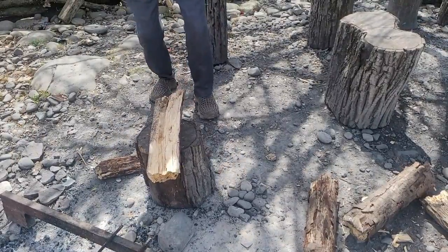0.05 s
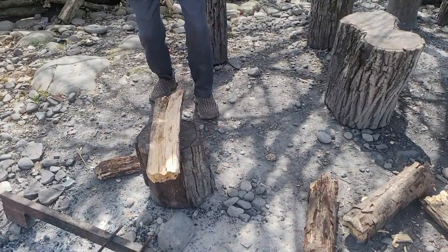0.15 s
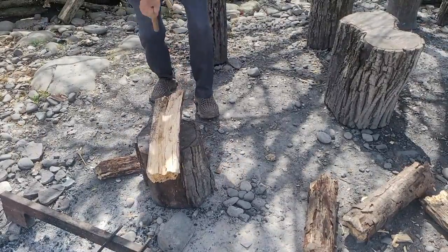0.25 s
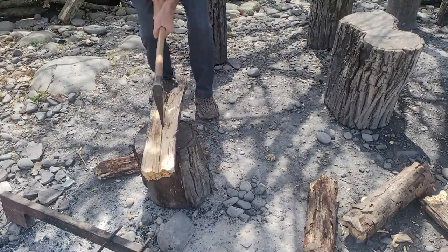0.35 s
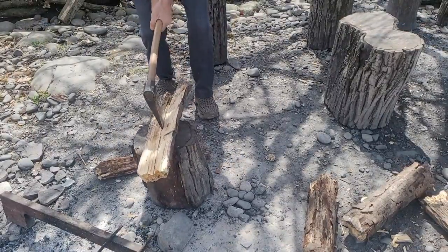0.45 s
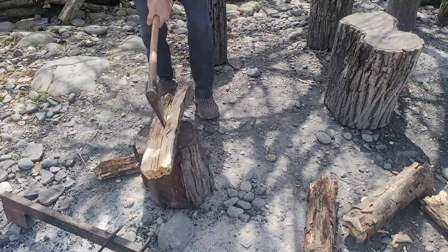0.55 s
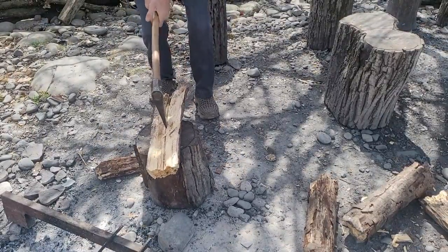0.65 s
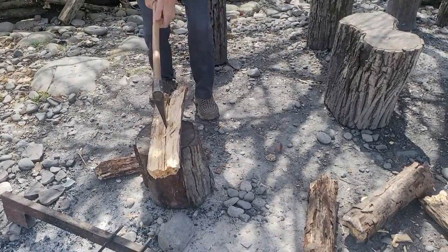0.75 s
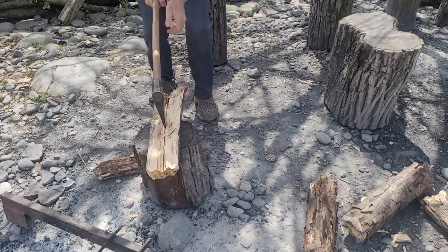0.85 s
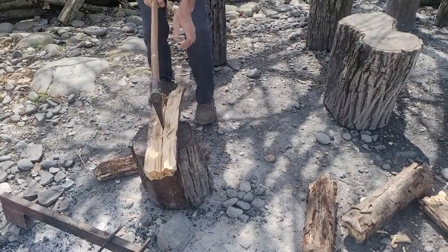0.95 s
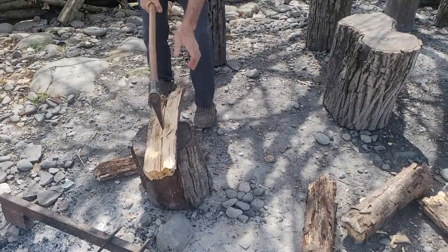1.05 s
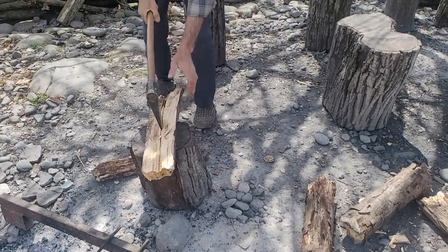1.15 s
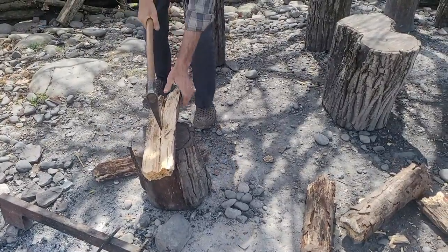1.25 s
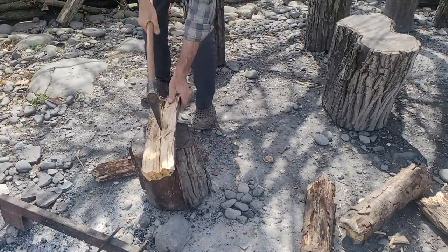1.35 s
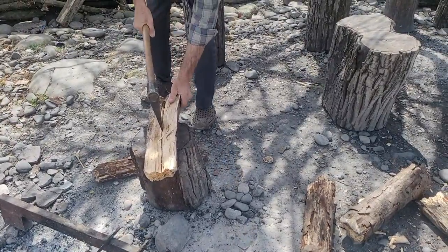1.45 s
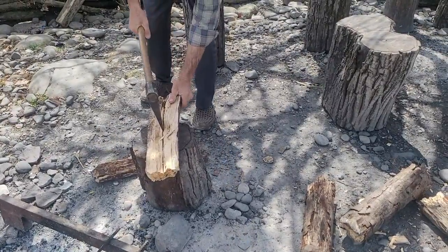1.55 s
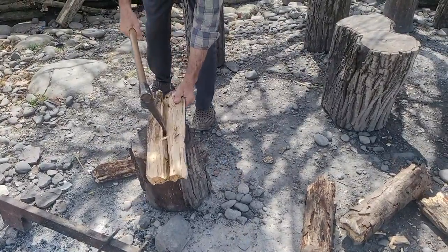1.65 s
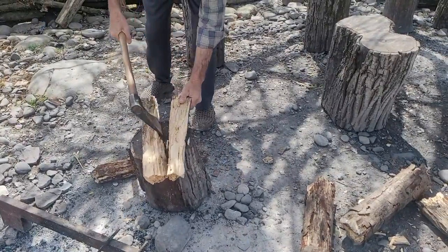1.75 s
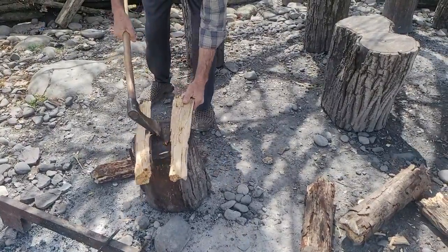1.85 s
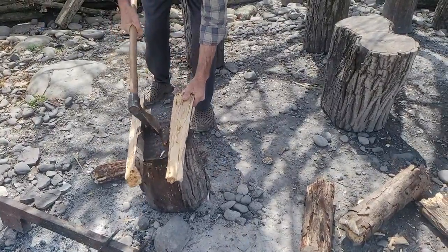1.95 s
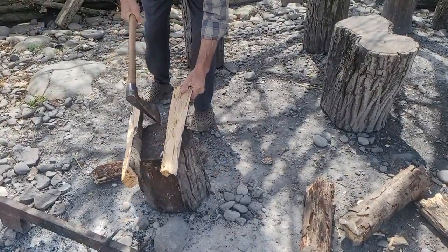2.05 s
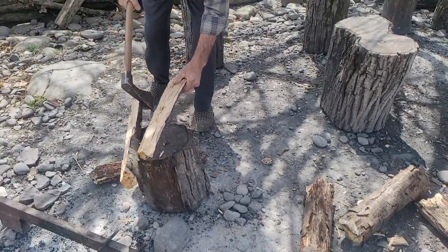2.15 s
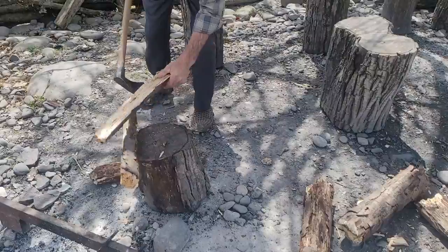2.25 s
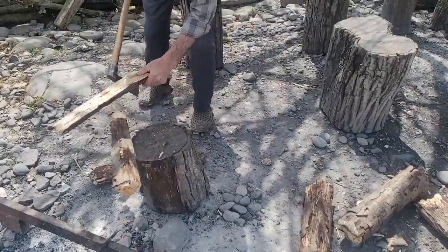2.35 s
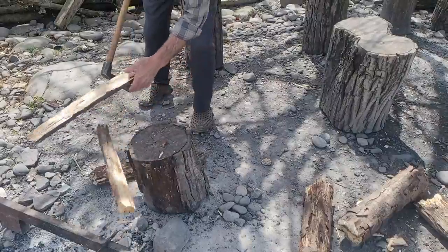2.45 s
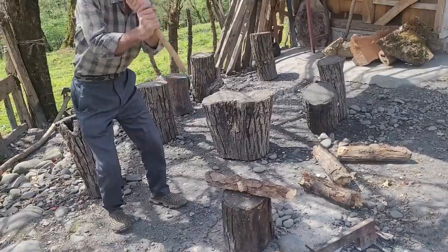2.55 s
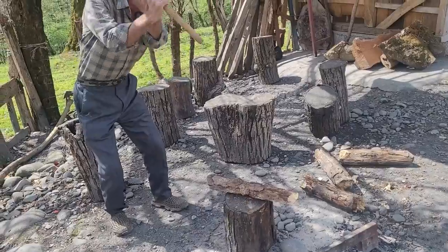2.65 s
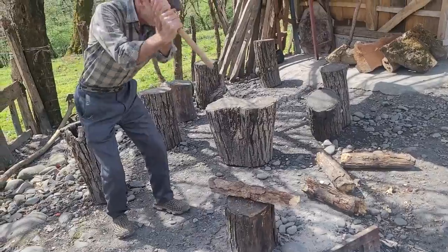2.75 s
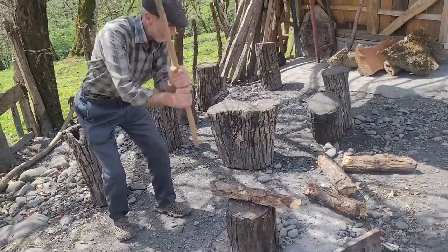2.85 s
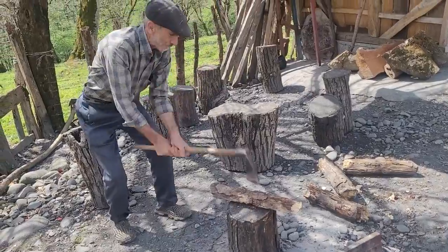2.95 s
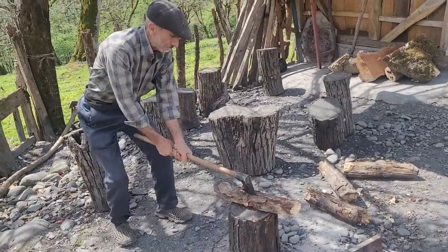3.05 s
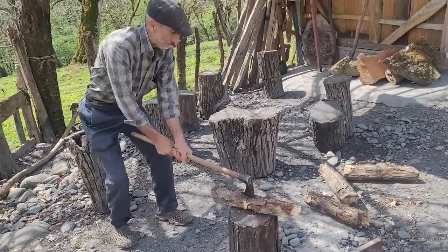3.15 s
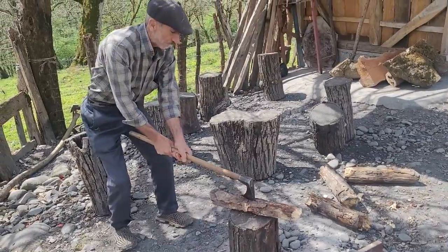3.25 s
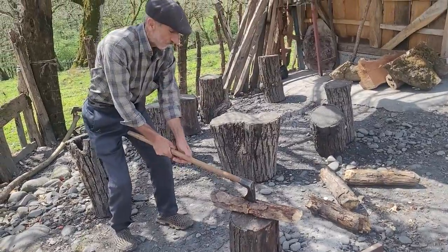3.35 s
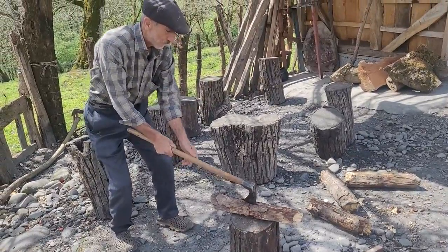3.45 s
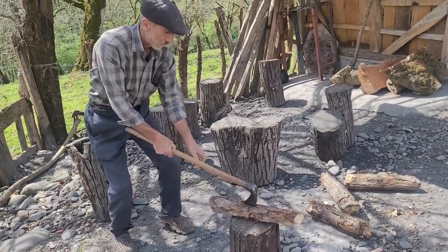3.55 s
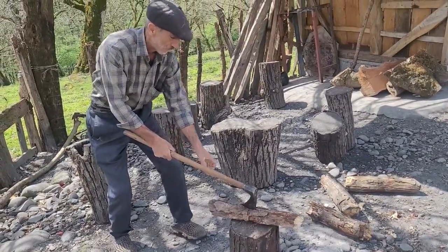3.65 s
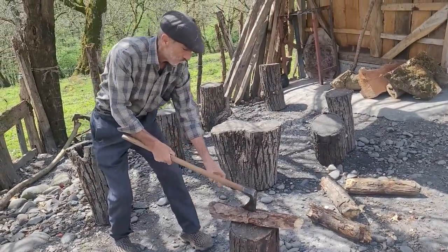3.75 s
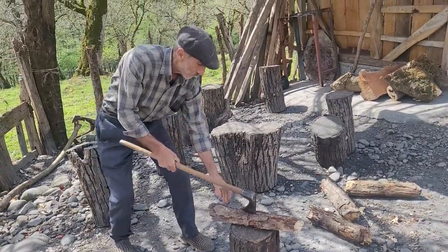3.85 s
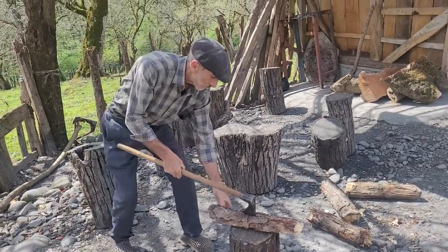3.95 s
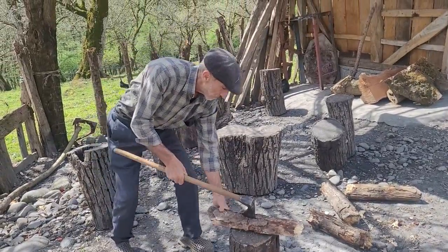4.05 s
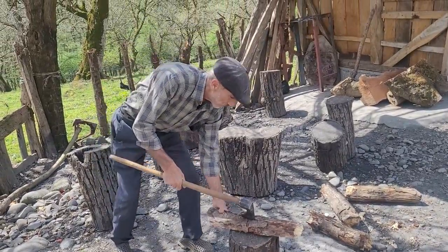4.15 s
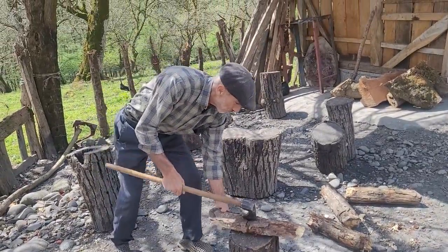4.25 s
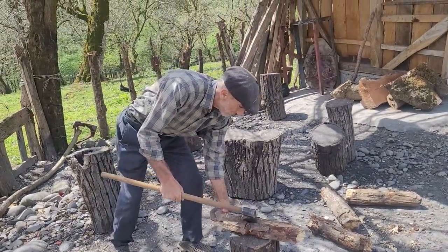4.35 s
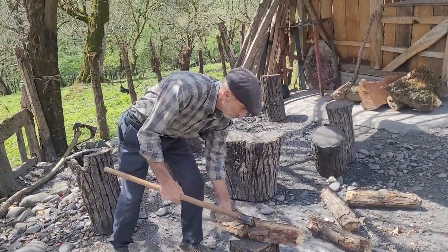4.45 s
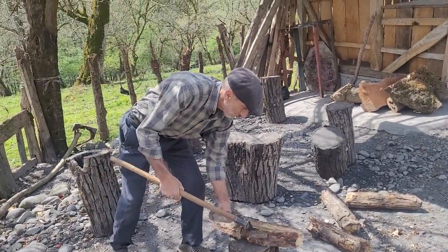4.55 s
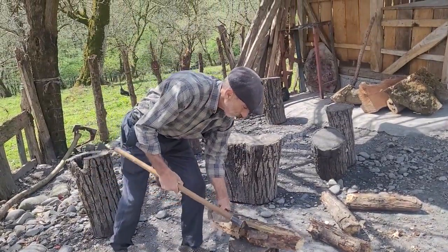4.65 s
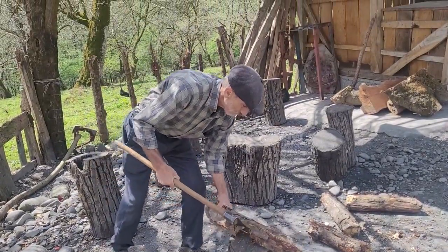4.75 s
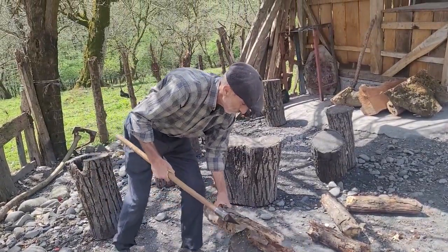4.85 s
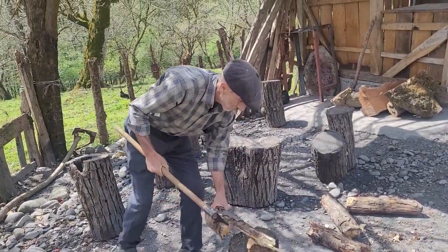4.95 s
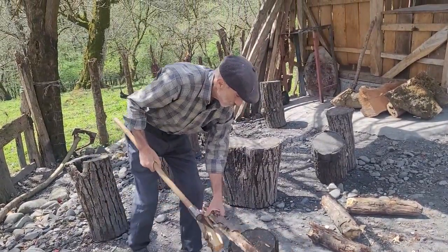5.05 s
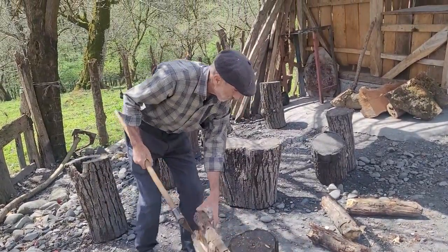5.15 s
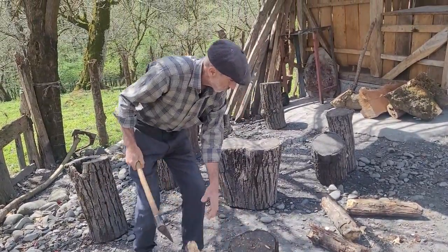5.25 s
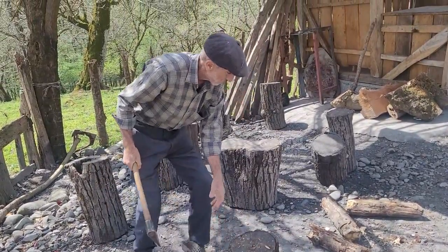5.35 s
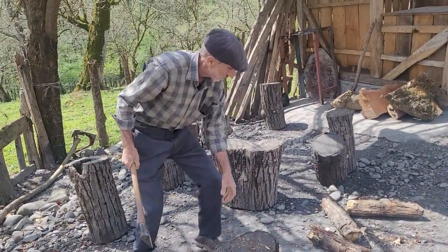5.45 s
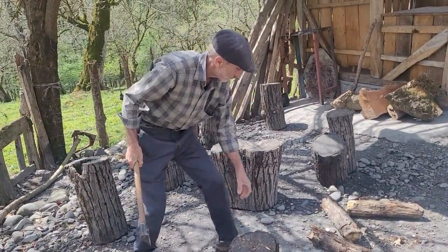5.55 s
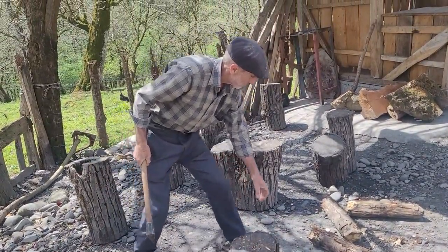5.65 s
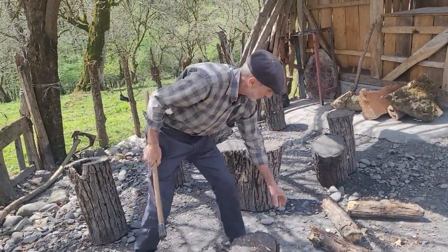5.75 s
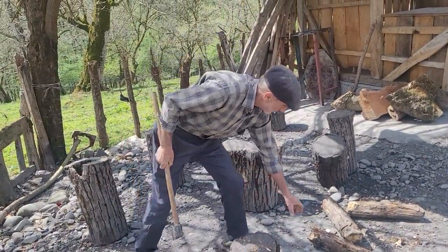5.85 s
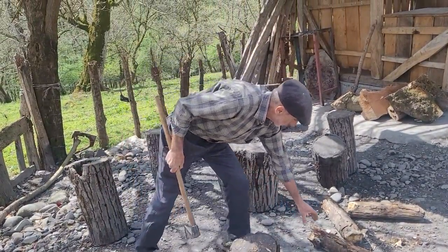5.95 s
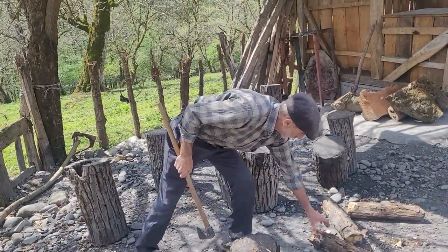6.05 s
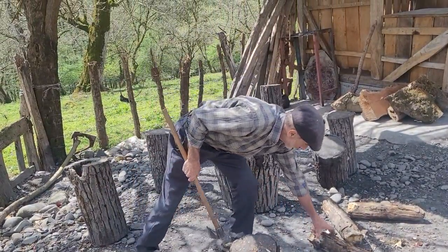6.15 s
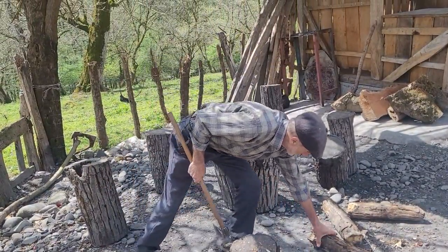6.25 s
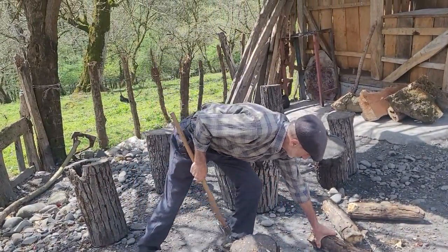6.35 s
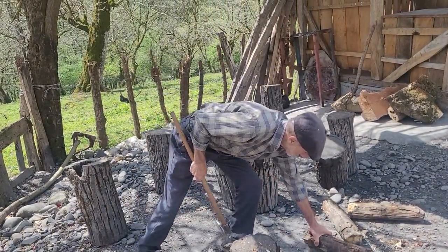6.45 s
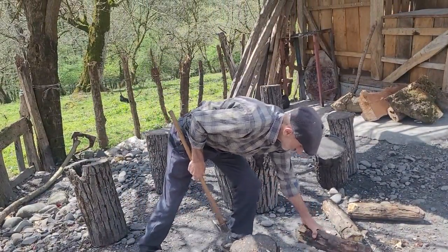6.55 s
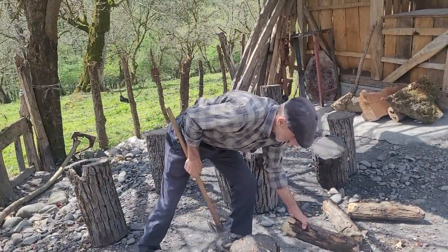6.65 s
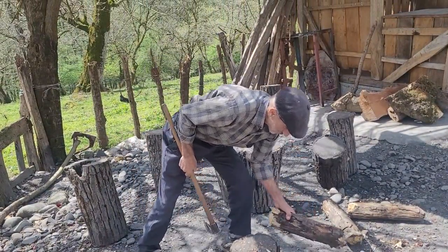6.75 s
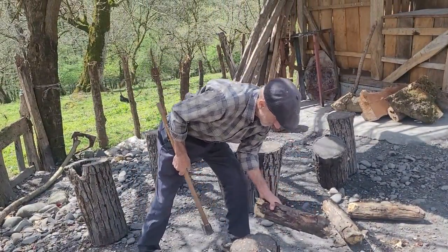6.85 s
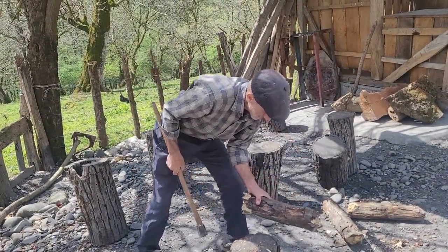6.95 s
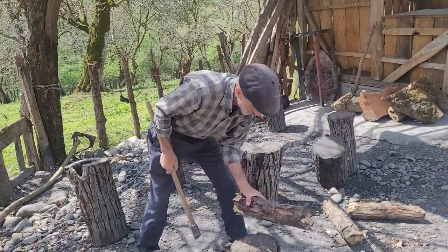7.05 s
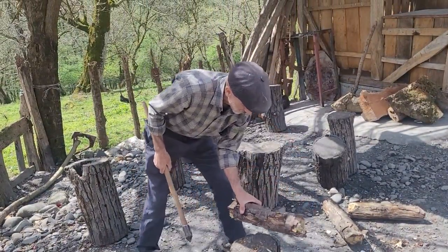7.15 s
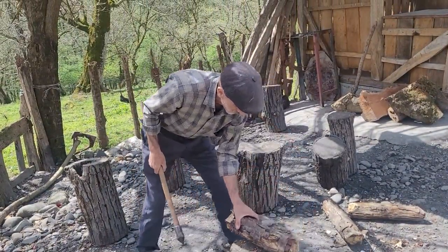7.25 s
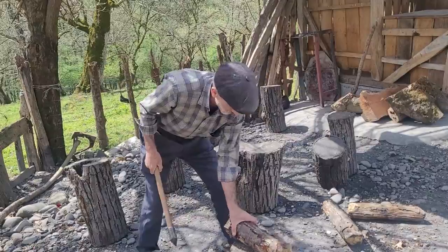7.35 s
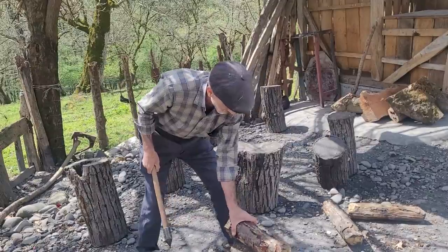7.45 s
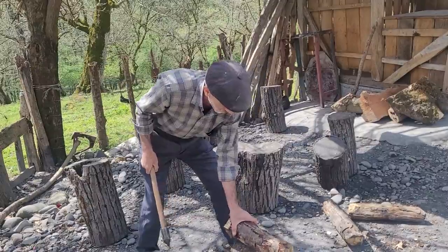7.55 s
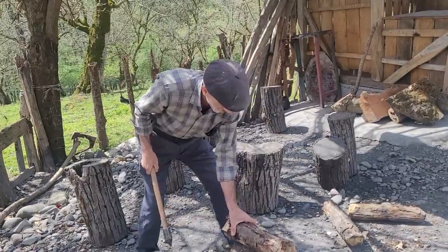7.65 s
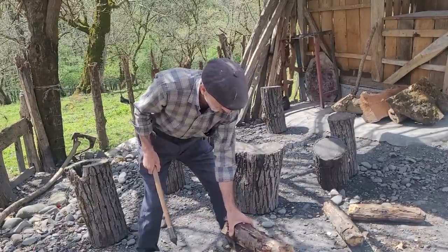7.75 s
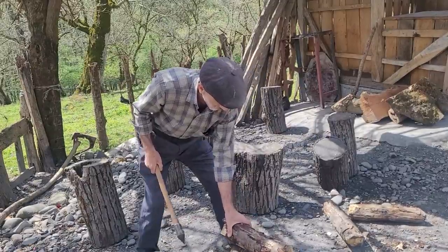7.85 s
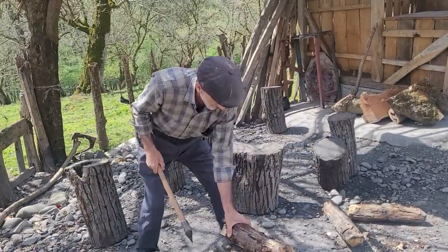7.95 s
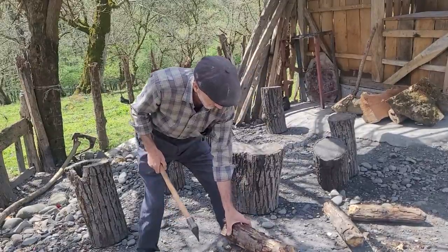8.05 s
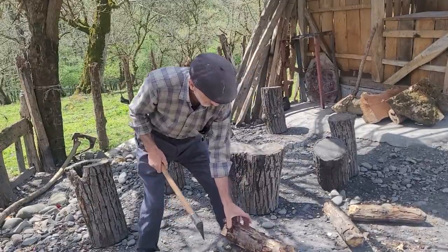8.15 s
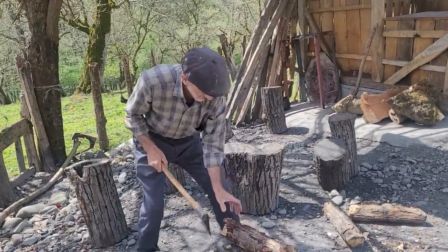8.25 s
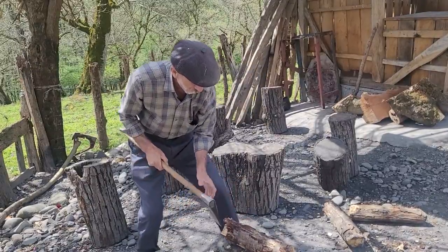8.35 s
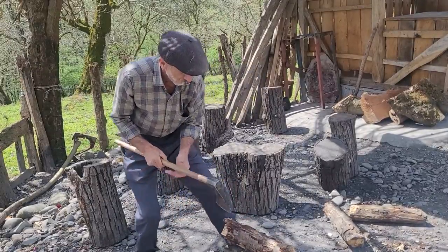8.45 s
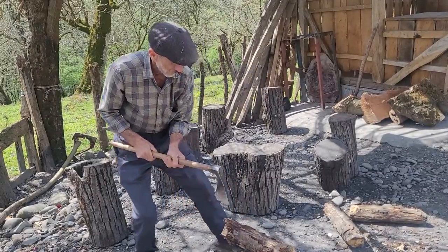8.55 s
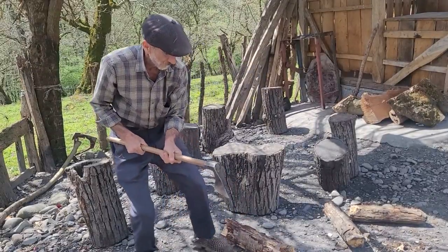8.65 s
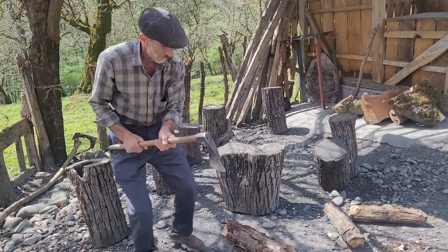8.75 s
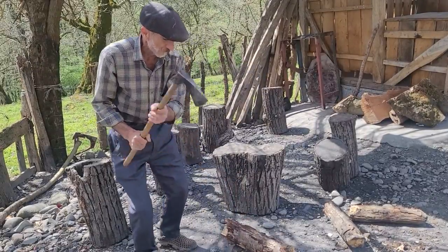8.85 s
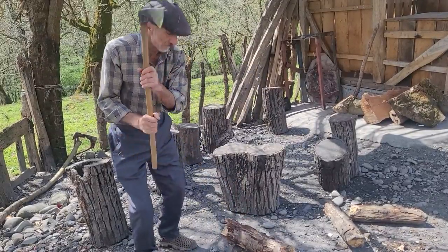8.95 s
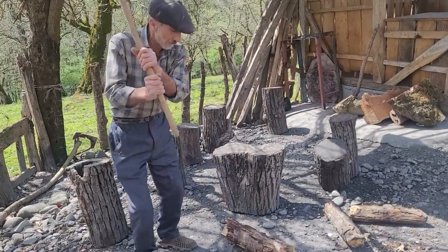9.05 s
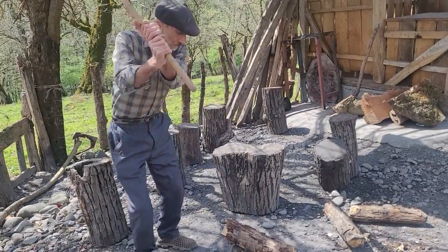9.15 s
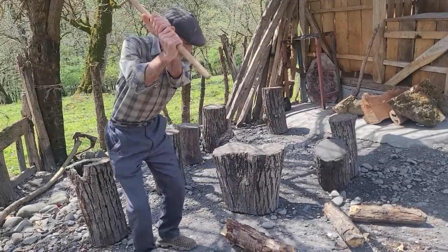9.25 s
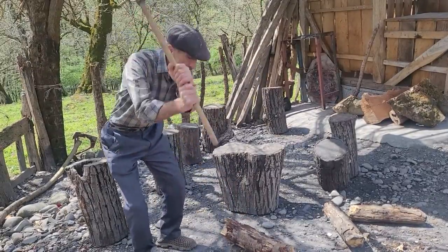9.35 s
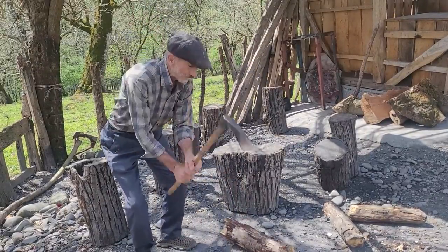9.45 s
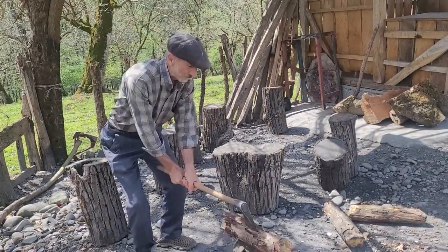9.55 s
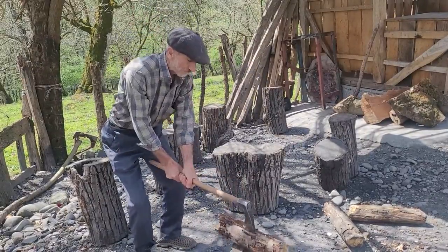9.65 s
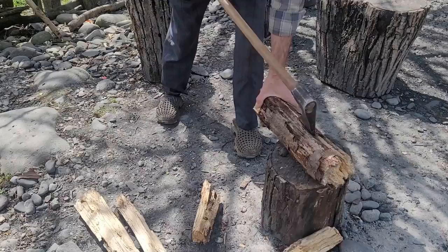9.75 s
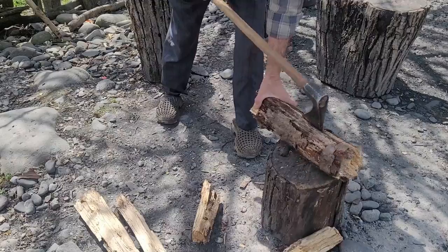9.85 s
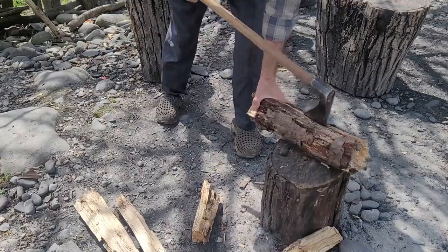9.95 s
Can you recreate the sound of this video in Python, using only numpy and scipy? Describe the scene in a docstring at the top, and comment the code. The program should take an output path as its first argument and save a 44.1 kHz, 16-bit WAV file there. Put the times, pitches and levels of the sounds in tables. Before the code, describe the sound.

Three heavy axe blows on wood, with splitting snaps, tumbling billets, a brief scrape over stones and sparrows chirping around.

```python
"""A sparrow cheeps over faint air and a far drone, then an axe splits firewood on a chopping block.
Blows, and a log set on the block, are decaying modes of log, block and earth with filtered grain bursts.
Billets snap apart, knock together and land; the axe head skids over stones; bark and soles rub.
Birds are gliding sines with a fast pitch buzz. Noise responses add the yard's scatter, tail and shed echo."""
import sys
import numpy as np
from scipy import signal
from scipy.fft import rfft, irfft
from scipy.io import wavfile

SR = 44100
rng = np.random.default_rng(int(sys.argv[2]) if len(sys.argv) > 2 else 0)


def to_wav(sig):
    """Store sig (one row per channel, or 1-D mono) as 16-bit WAV at the path in sys.argv[1].

    Samples outside -1..1 are clipped; the rate is SR.
    """
    pcm = np.clip(np.atleast_2d(sig), -1, 1) * 32767
    pcm = np.round(pcm).astype(np.int16)
    wavfile.write(sys.argv[1], SR, pcm.T)  # frames by channels


N = 440559
TIME_S = np.arange(N) / SR
SHORT_S = TIME_S[:SR // 2]  # half a second, for single events
TOP_HZ = 16000

# Crunch and yard bands: (low edge [Hz], high edge [Hz])
BANDS_HZ = [(170, 500), (500, 1500), (1500, 5000), (5000, 14500)]

# Air spectrum: (frequency [Hz], relative density [dB per Hz])
AIR_SPECTRUM = [(30, -8), (100, -7), (200, -13), (290, -8), (450, -14.5), (600, -11.5), (970, -16.5),
                (1400, -20), (2500, -28.5), (4000, -16), (7000, -28), (15000, -35)]
AIR_DB, RUMBLE_DB = -69.5, -76
# Rumble swells: (peak time [s], rise [s], fall [s], level [dB])
RUMBLE_SWELLS = [(0, .1, .4, -61), (.6, .4, .55, -57.5), (2.4, 0.29, 0.37, -51.5), (9.98, .3, .1, -57.5)]
# Far drone before its wobble: (time [s], frequency [Hz], level [dB])
DRONE_TRACK = [(0, 650, -66.5), (1.1, 640, -75), (2.2, 647, -64.5), (3.2, 650, -73), (5, 645, -77.5),
               (7.2, 595, -88.5), (8.2, 573, -69.5), (8.5, 574, -86), (10, 586, -81)]

# Bird notes: (time in note [s], frequency before pitch factor [Hz], relative level [dB], buzz depth [Hz])
# Sparrow: sharp flick, then buzzing fall
CHEEP_NOTE = [(0, 3300, -22, 1), (.008, 4340, -14, 80), (.013, 5120, -5.5, 150), (.021, 4580, -11, 310),
              (.032, 4220, -8, 250), (.037, 3950, 0, 280), (.06, 3614, -3.5, 260), (.08, 3600, -6, 210),
              (.112, 2920, -26.5, 180)]
# Chirrup, same columns
CHIRRUP_NOTE = [(0, 3844, -10.5, 3.5), (.025, 5423, 4.5, 204), (.038, 4266, -0.5, 109.5),
                (.055, 3750, -5.5, 82), (.08, 3000, -18, 56.5), (.1, 3248, -5.5, 77),
                (.118, 4122, -3.5, 119.5), (.132, 3597, -5.5, 77.5), (.155, 3288, -20, 54)]
# Small bird's thin whistle, same columns
WHISTLE_NOTE = [(0, 8010, 10, 6), (.018, 8695, -3, 13), (.09, 7850, 3.5, 34.5), (.16, 7900, 1, 84),
                (.2, 7773, -16.5, 0)]
# Small bird's falling slur, same columns
SLUR_NOTE = [(0, 7900, -11, 1.5), (.018, 6500, -2.5, 30.5), (.04, 5800, -1, 29), (.065, 5400, -4, 29.5),
             (.085, 5950, -7, 33.5), (.11, 6020, -15.5, 22.5)]
# Cheep calls: (time [s], relative level [dB], pitch factor [ratio])
CHEEP_CALLS = [(.005, -29, 0.98), (1.014, -37, 0.98), (1.735, -37, 1), (2.356, -30.5, 1.014),
               (3.056, -38.5, 1.03), (3.997, -38.5, 1.003), (5.184, -34, 0.99), (6.254, -34.5, 1),
               (7.149, -35.5, 0.99), (8.275, -36, 0.98), (9.592, -37, 0.98), (9.814, -38, 0.99)]
# Chirrup calls, same columns
CHIRRUP_CALLS = [(1.044, -49.5, 0.93), (1.372, -58, 1), (1.43, -53, 0.92), (1.881, -43.5, 0.97),
                 (2.661, -43.5, 1), (3.365, -43.5, 1), (4.866, -47.5, 0.94), (4.921, -45, 0.93),
                 (5.389, -40, 0.95), (6.006, -38.5, 0.94), (6.74, -43.5, 1), (7.702, -67.5, 0.96),
                 (8.0, -62, 1), (8.709, -57, 0.93), (8.958, -55, 1), (9.266, -44.5, 1)]
# Whistle calls, same columns
WHISTLE_CALLS = [(2.25, -60.5, 1.025), (2.496, -68, 0.9), (6.26, -68, 1.07), (6.52, -65.5, .99),
                 (6.77, -67, 1.06)]
# Slur calls, same columns
SLUR_CALLS = [(0.056, -48.5, 1.036), (0.259, -52.5, 0.95), (7.012, -67, 1.05), (7.195, -61, 1.05)]

# Bark dragged over wood and gravel: (peak time [s], rise [s], fall [s], level [dB], grit re level [dB])
BARK_DRAGS = [(1.474, 0.38, 0.055, -64.5, -6), (1.712, .01, 0.018, -36.5, -9.5),
              (3.43, 0.033, 0.14, -60.5, -18), (3.97, .25, .05, -72.5, -9), (4.458, .06, 0.047, -69, -9),
              (4.884, 0.14, 0.67, -71, 5.5), (5.205, 0.084, 0.044, -52.5, -11), (5.485, 0.026, .13, -66, 5),
              (5.68, 0.068, 0.022, -53, -21), (5.91, 0.022, 0.28, -53.5, -18.5),
              (6.54, 0.091, .08, -53, -11), (8.864, 0.13, 0.048, -47, -14), (9.856, .06, 0.38, -52, -13)]
# Soles shifting on gravel, same columns
SOLE_SHUFFLES = [(1.82, 0.063, 0.028, -50, -19), (1.89, 0.072, .12, -55.5, -25.5),
                 (2.6, 0.088, 0.73, -63, 0), (3.43, .15, 0.32, -66, -10), (4.46, 0.86, .45, -68, 0.5),
                 (4.72, 0.19, .03, -90.5, 28), (5.1, .3, 0.23, -70.5, -1.5), (6.45, 1, 0.59, -76, 7),
                 (8.64, 0.14, .12, -59.5, -12.5), (8.864, .2, .2, -61.5, -14),
                 (9.97, .08, 0.093, -66.5, -7.5)]
# Axe head cutting the air: (peak time [s], level [dB])
AXE_SWINGS = [(3.019, -49)]
SWING_RISE_S, SWING_FALL_S = .17, .02
GESTURE_FADE_DB = 20  # loss one rise before, or one fall after, a gesture's peak

# Axe head skidding over stones: (time [s], level [dB], t60 [s])
AXE_SKIDS = [(5.706, -35, 0.039), (5.737, -27.5, 0.27), (5.801, -30, 0.037), (5.865, -39, 0.26),
             (5.953, -53, 0.1)]
# Steel and stone resonances: (frequency [Hz], width, at least 35 used [Hz], relative level [dB])
SKID_RESONANCES = [(448, 81, 0.5), (578, 15, 3), (1126, 160, 6), (1560, 280, 4.5), (2190, 72, -2),
                   (2395, 20, -1), (2650, 60, 3.5), (3063, 30, 11.5), (3500, 22, -24), (3590, 26, -29),
                   (3820, 30, -35)]

# Loose-billet resonances: (frequency before pitch factor [Hz], width [Hz], relative level [dB])
BILLET_RESONANCES = [(278, 66, 12.5), (336, 120, -9), (600, 70, -5.5), (720, 80, 4), (1000, 80, -3),
                     (1284, 90, -2), (1480, 90, -4.5), (1620, 120, -6), (2333, 150, -2), (2910, 110, -3.5),
                     (3540, 250, -7.5)]
CONTACT_LAG_S = .0013  # snaps and knocks start this long after their table time
# Snapping fibres: (time before lag [s], relative level [dB], brightness [dB per band], t60 [s])
FIBRE_SNAPS = [(.568, -64.5, 8.5, 0.024), (0.694, -66, -4, 0.043), (1.618, -28, -2.5, 0.018),
               (1.647, -34.5, -3, 0.052), (1.657, -35, 1, 0.12), (1.671, -29.5, -3, 0.21),
               (3.612, -60, 9, 0.14), (3.638, -61, 9.5, .05), (4.235, -54.5, 6, .05),
               (4.257, -43.5, 4.5, 0.15), (4.29, -35.5, -2.5, 0.068), (4.311, -43.5, 4, .068),
               (4.369, -56, 7, .02), (5.4106, -32.5, -5.5, 0.027), (7.354, -48, -1, 0.069),
               (7.665, -63.5, 1.5, .05)]
# Billets knocking and landing, same columns
BILLET_KNOCKS = [(1.024, -58, 1.5, .11), (1.321, -65.5, 1.5, 0.045), (1.459, -54.5, 4.5, .05),
                 (1.682, -23.5, 6, 0.024), (1.735, -76, -16.5, 0.035), (1.834, -41, 5, 0.031),
                 (3.139, -52, -1, 0.072), (3.784, -52.5, 1, 0.097), (4.338, -50.5, 1, 0.094),
                 (4.431, -72, -9, 0.16), (4.76, -48, 6.5, 0.024), (4.772, -51, 4.5, 0.074),
                 (4.81, -64, -3, .044), (5.227, -41.5, -2.5, 0.063), (5.241, -44, 3, .088),
                 (5.297, -50.5, 0.5, 0.06), (5.329, -38, 9.5, 0.051), (5.338, -37.5, -2.5, 0.062),
                 (5.351, -46, -5.5, 0.038), (5.439, -37.5, 0.5, 0.037), (5.446, -37, 1, .045),
                 (5.545, -49, 5, 0.028), (5.671, -60.5, 0.5, 0.15), (5.71, -45, 1.5, 0.079),
                 (5.875, -57.5, -4, 0.037), (8.782, -52.5, 6.5, .08), (8.834, -56, 2.5, .047),
                 (8.882, -51, 4.5, 0.08)]
# Snap spectrum: (level offset in each of BANDS_HZ [dB])
SNAP_COLOUR_DB = [-29.5, -16.5, 0.5, -2]
# Knock spectrum, same columns
KNOCK_COLOUR_DB = [1.5, 3, 0.5, -9]
SNAP_TICK_DB, KNOCK_TICK_DB = 10.5, 4  # re event level
CHIP_DB, CHIP_T60_S = -68.5, .06
# Taps on a freely swinging split half: (time [s], relative level [dB])
SPLIT_HALF_TAPS = [(1.838, -41.5), (2.265, -32.5)]
# Split-half modes: (frequency before pitch factor [Hz], relative level [dB], t60 [s])
SPLIT_HALF_MODES = [(555, 1.5, 0.19), (775, -14, 0.14), (1350, -13.5, 0.086), (2360, -32.5, 0.052)]

# Log-on-block modes: (frequency before pitch factor [Hz], relative level [dB], t60 [s])
LOG_MODES = [(262.5, -1, 0.097), (323, -15, 0.14), (400, -18.5, 0.092), (445, -23.5, .05),
             (625, -30.5, .09), (665, -26.5, .1), (770, -30.5, 0.11), (1124, -36.5, 0.15),
             (1273, -31, 0.11), (1450, -30, 0.093), (1850, -36, 0.25), (2080, -38.5, .12)]
# Chopping-block hum under every contact: (frequency [Hz], relative level [dB], t60 [s])
STUMP_MODES = [(232.3, -16.5, 0.24)]
# Block-on-earth modes: (frequency before pitch factor [Hz], relative level [dB], t60 [s])
GROUND_MODES = [(70, -2.5, 0.087), (106, -5.5, 0.11)]
# Weight coming down on the earth: (time [s], relative level [dB])
EARTH_THUDS = [(1.685, -47), (1.736, -64), (1.829, -36), (3.14, -34), (5.232, -48), (5.341, -42.5),
               (5.443, -46), (5.8, -44), (5.85, -43)]
# Second contact, log pressed on the block or bouncing back: (time [s], relative thump level [dB],
# pitch factor [ratio], relative ground level [dB], relative crunch level [dB],
# crunch brightness [dB per band])
SECOND_CONTACTS = [(0.3571, -14.5, 1.0, -10.5, -27.5, -3.5), (.449, -24, 1, -42, -50, -4.5),
                   (3.0444, -9, 0.98, -18, -29.5, -.5), (7.3345, -27, 0.95, -38, -47.5, 6.5),
                   (9.5712, -5.5, 0.94, -11, -40, -3), (9.691, -23.5, 0.97, -28, -53, -4.5)]
# First contact, blade biting the log or (7.32 s) a log set on the block: (time [s],
# relative thump level [dB], thump pitch factor [ratio], knock before pitch factor [Hz],
# relative knock level [dB], relative crunch level [dB], crunch brightness [dB per band])
FIRST_CONTACTS = [(0.3495, -2, 1.05, 700, -6, -27, -6.5), (3.0325, -18.5, 1.44, 790.5, -22.5, -28, 1),
                  (3.0362, -12, 1.32, 1400, -11, -24, -0.5), (7.3232, -23, .96, 1210, -37.5, -40.5, 4),
                  (9.56, -12, 1.2, 1284, -12, -32.5, -2), (9.563, -4, 1.02, 380, -12, -31.5, -5.5)]
FIRST_T60_S, SECOND_T60_S = .05, 0.12
FIRST_GROUND_DB = -33.5  # re thump


def amp(db):
    """Decibels to gain."""
    return 10 ** (np.asarray(db) / 20)


def unit(x):
    """Scale to rms 1."""
    return x / np.sqrt(np.mean(x ** 2))


def curves(table, t_s=TIME_S):
    """Join table columns by straight lines in time."""
    s, *columns = np.transpose(table)
    return [np.interp(t_s, s, c) for c in columns]


def add(out, s, x):
    """Mix a sound in at time s."""
    i = max(int(s * SR), 0)
    out[:, i:i + x.shape[-1]] += x[..., :N - i]


def band(x, lo_hz, hi_hz, order=3):
    """Causal band-pass."""
    edges_hz = [lo_hz, min(hi_hz, .49 * SR)]
    return signal.sosfilt(signal.butter(order, edges_hz, "band", fs=SR, output="sos"), x)


def decay(t60_s):
    """Exponential decay, 60 dB in t60_s."""
    return 1000 ** (-SHORT_S / t60_s)


def onset(rise_s):
    """Exponential approach to full gain."""
    return 1 - np.exp(-SHORT_S / rise_s)


def pair(size, apart):
    """Two-channel noise: a shared part plus a separate part per channel."""
    noise = rng.standard_normal((3, size))
    return unit(noise[0] + apart * noise[1:])


def grains(size, spread_db, apart):
    """Noise in 32-sample grains of very unequal size."""
    sizes_db = spread_db * np.minimum(rng.exponential(size=size // 32 + 1), 5)
    return unit(pair(size, apart) * np.repeat(amp(sizes_db), 32)[:size])


def resonate(x, hz, width_hz):
    """One resonance, gain 1 at its centre."""
    return signal.lfilter(*signal.iirpeak(hz, hz / width_hz, fs=SR), x)


def ring(modes, pitch):
    """Free decay of struck modes."""
    out = 0
    for hz, db, t60_s in modes:
        out = out + amp(db) * np.sin(2 * np.pi * hz * pitch * SHORT_S) * decay(t60_s)
    return out


def push(x, contact_s):
    """Contact-force smoothing: longer contact, duller ring."""
    force = np.hanning(int(contact_s * SR) + 3)
    return np.convolve(x, force / force.sum())


def gesture_gain(peak_s, rise_s, fall_s, db):
    """Gain linear in dB on both sides of a peak, silent beyond three rises or falls."""
    before = (peak_s - TIME_S) / max(rise_s, .005)
    after = (TIME_S - peak_s) / max(fall_s, .005)
    away = np.maximum(before, after)
    gain = np.zeros(N)
    close = away < 3
    gain[close] = amp(db - GESTURE_FADE_DB * away[close])
    return gain


def yard(x, near_db, near_t60_s, tail_db, low_t60_s, high_t60_s, echo_db, echo_s):
    """Scatter from ground and stumps, thin open-air tail, smeared shed echo."""
    edges = [(30, BANDS_HZ[0][1])] + BANDS_HZ[1:]
    tail_t60s_s = np.geomspace(low_t60_s, high_t60_s, len(edges))
    response = 0
    for (lo_hz, hi_hz), tail_t60_s, apart in zip(edges, tail_t60s_s, (.4, 1.5, 4, 6)):
        noise = band(pair(len(SHORT_S), apart), lo_hz, hi_hz)
        parts = ((near_db, .002, near_t60_s), (tail_db, .015, tail_t60_s), (echo_db, echo_s, .1))
        for db, start_s, t60_s in parts:
            fade = (SHORT_S > start_s) * decay(t60_s)
            response = response + amp(db) * noise * fade / np.linalg.norm(fade)
    return x + signal.fftconvolve(x, response, axes=1)[:, :N]


def soft_air(swell):
    """Broadband noise shaped by the air spectrum, slowly varying in level."""
    hz, db = np.transpose(AIR_SPECTRUM)
    bins_hz = np.arange(N // 2 + 1) * SR / N
    colour = amp(np.interp(np.log(bins_hz + 1), np.log(hz), db))
    air = unit(irfft(rfft(pair(N, apart=2.3)) * colour, N))
    return air * amp(AIR_DB + .8 * swell)


def low_rumble():
    """Narrow low noise that swells now and then."""
    gain = amp(RUMBLE_DB) + sum(gesture_gain(*row) for row in RUMBLE_SWELLS)
    return unit(band(pair(N, apart=0.11), 42, 75, order=2)) * gain


def far_drone(swell, hum_db=-80, waver_depth=0.23):
    """Thin tone and its lower octave, blurred by moving air."""
    hz, db = curves(DRONE_TRACK)
    shimmer = unit(band(rng.standard_normal(N), 4, 30, order=1))
    phase = 2 * np.pi * np.cumsum(hz * (1 + 0.0018 * swell + .011 * shimmer)) / SR
    waver = 1 + waver_depth * unit(band(pair(N, apart=.6), 1, 18, order=2))
    return waver * (amp(db) * np.sin(phase) + amp(hum_db) * np.sin(phase / 2))


def outdoors():
    """Air, rumble and drone; one slow swell moves air level and drone pitch."""
    swell = unit(band(rng.standard_normal(N), .5, 6, order=1))
    return soft_air(swell) + low_rumble() + far_drone(swell)


def bird(note, calls, buzz_hz, rasp, overtone_db, wander=.02, flutter_db=3):
    """Whistled glide with a fast pitch buzz; contour and loudness differ per call."""
    out = np.zeros((2, N))
    t_s = TIME_S[:int(note[-1][0] * SR)]
    hz, shape_db, depth_hz = curves(note, t_s)
    for s, db, pitch in calls:
        waver = unit(band(rng.standard_normal(len(t_s)), 30, 340, order=1))
        bend = np.interp(t_s, np.linspace(0, t_s[-1], 6), rng.standard_normal(6))
        flutter = np.interp(t_s, np.linspace(0, t_s[-1], 20), rng.standard_normal(20))
        buzz = np.sin(2 * np.pi * (buzz_hz * t_s + rng.random()))
        glide_hz = pitch * hz * (1 + rasp * waver + wander * bend) + depth_hz * buzz
        phase = 2 * np.pi * np.cumsum(glide_hz) / SR
        voice = np.sin(phase) + amp(overtone_db) * np.sin(2 * phase)
        gain = amp(db + shape_db + flutter_db * flutter) * signal.windows.tukey(len(t_s), .08)
        add(out, s, gain * voice)
    return out


def birds():
    """Sparrow near the shed; other voices carry through trees and arrive blurred."""
    near = bird(CHEEP_NOTE, CHEEP_CALLS, buzz_hz=185.7, rasp=.02, overtone_db=-37.5,
                wander=0.017, flutter_db=0.5)
    far = bird(CHIRRUP_NOTE, CHIRRUP_CALLS, buzz_hz=283, rasp=0.037, overtone_db=-22.5,
               wander=0.034, flutter_db=5.0)
    far += bird(WHISTLE_NOTE, WHISTLE_CALLS, buzz_hz=95, rasp=.008, overtone_db=-60, wander=0.0041)
    far += bird(SLUR_NOTE, SLUR_CALLS, buzz_hz=90, rasp=.004, overtone_db=-53, wander=0.0089)
    near = yard(near, near_db=-3, near_t60_s=.045, tail_db=-16, low_t60_s=.45, high_t60_s=.38,
                echo_db=-30, echo_s=.09)
    far = yard(far, near_db=1, near_t60_s=.06, tail_db=-3, low_t60_s=.55, high_t60_s=.45,
               echo_db=-11, echo_s=.08)
    return amp(-1.0) * near + amp(-9.5) * far


def firewood(x, pitch, direct):
    """Contact noise heard straight and through billet resonances."""
    rung = sum(amp(db) * resonate(x, hz * pitch, width_hz) for hz, width_hz, db in BILLET_RESONANCES)
    return direct * x + rung


def catching(depth_db=1.5, slow_hz=8, fast_hz=60):
    """Uneven gain as rubbing catches and slips."""
    return amp(depth_db * unit(band(rng.standard_normal(N), slow_hz, fast_hz, order=2)))


def rubs():
    """Dragged bark and shuffling soles: dense grains; the drags also ring a billet."""
    out = np.zeros((2, N))
    scrape = firewood(grains(N, spread_db=3.5, apart=.6), 0.9, direct=0.51)
    scrape = unit(band(scrape, 1300, 4100, order=2))
    grit = unit(band(grains(N, spread_db=2.0, apart=1.0), 3500, 17000, order=1))
    dull = unit(band(grains(N, spread_db=1.5, apart=0.33), 200, 800))
    for table, body in ((BARK_DRAGS, scrape), (SOLE_SHUFFLES, dull)):
        for s, rise_s, fall_s, db, grit_db in table:
            out += gesture_gain(s, rise_s, fall_s, db) * (body + amp(grit_db) * grit)
    return out * catching()


def swishes():
    """Low band of air noise as the axe head swings."""
    gain = sum(gesture_gain(s, SWING_RISE_S, SWING_FALL_S, db) for s, db in AXE_SWINGS)
    return gain * unit(band(pair(N, apart=0.42), 240, 410, order=2))


def skids(rise_s=0.0034):
    """Dense little impacts ring steel and stones, fading as the head slows."""
    out = np.zeros((2, N))
    for s, db, t60_s in AXE_SKIDS:
        contact = grains(len(SHORT_S), spread_db=1.9, apart=0.55)
        ringing = 0
        for hz, width_hz, gain_db in SKID_RESONANCES:
            ringing = ringing + amp(gain_db) * resonate(contact, hz, max(width_hz, 35))
        ringing = unit(band(ringing, 150, 5600, order=2))
        add(out, s, amp(db) * ringing * onset(rise_s) * decay(t60_s))
    return out


def tilted(db, brightness):
    """Level per band: a slope pivoting on the third band."""
    return db + brightness * (np.arange(len(BANDS_HZ)) - 2)


def crunch(levels_db, t60_s, direct, spread_db):
    """Grainy wood contact rings the wood; each band's energy equals 20 ms at its level."""
    burst = grains(len(SHORT_S), spread_db, apart=.8) * decay(max(t60_s, .008))
    burst = firewood(burst, 1 + 0.045 * rng.standard_normal(), direct)
    burst = signal.lfilter([1], [1, -.5], burst)  # wood soaks up the top treble
    out = 0
    for i, (db, (lo_hz, hi_hz)) in enumerate(zip(levels_db, BANDS_HZ)):
        source = burst if i else burst[[0, 0]]  # long waves reach both ears alike
        out = out + amp(db) * unit(band(source, lo_hz, hi_hz))
    return out * np.sqrt(20 / 500)


def clack(db, brightness, t60_s, colour_db, tick_db, rise_s, tick_t60_s=.0023):
    """Hard tick, plus a crunch that builds as the contact closes and rings the billet."""
    tick = band(pair(len(SHORT_S), apart=.7) * decay(tick_t60_s), 1000, 3800, order=1)
    body = crunch(tilted(db, brightness) + colour_db, t60_s, direct=.64, spread_db=5.0)
    return amp(db + tick_db) * tick + body * onset(rise_s)


def knocks(chip_count=8):
    """Bright snaps, duller landings, stray bark chips; a free billet rings on."""
    out = np.zeros((2, N))
    for s, db, brightness, t60_s in FIBRE_SNAPS:
        snap = clack(db, brightness, t60_s, SNAP_COLOUR_DB, SNAP_TICK_DB, rise_s=0.00024)
        add(out, s + CONTACT_LAG_S, snap)
    for s, db, brightness, t60_s in BILLET_KNOCKS:
        knock = clack(db, brightness, t60_s, KNOCK_COLOUR_DB, KNOCK_TICK_DB, rise_s=0.0011)
        add(out, s + CONTACT_LAG_S, knock)
    for s in rng.uniform(0, TIME_S[-1], chip_count):
        add(out, s, clack(CHIP_DB, 0, CHIP_T60_S, SNAP_COLOUR_DB, SNAP_TICK_DB, rise_s=0.0024))
    for s, db in SPLIT_HALF_TAPS:
        add(out, s, amp(db) * ring(SPLIT_HALF_MODES, 0.96))
    return out


def contact_crunch(thump_db, db, brightness, t60_s, rattle_db=-23, rise_s=0.00034):
    """Grainy crunch of a log contact; its lowest band rattles with the thump."""
    levels_db = [thump_db + rattle_db, *tilted(db, brightness)[1:]]
    return crunch(levels_db, t60_s, direct=.8, spread_db=4.07) * onset(rise_s)


def thump(pitch, size_db=1.0, low_hz=190):
    """Log and block ring together, too small to radiate deep bass."""
    modes = ring(LOG_MODES, pitch) + ring(STUMP_MODES, 1)
    return amp(size_db) * band(modes, low_hz, TOP_HZ, order=2)


def earth(contact_s):
    """Block-on-earth modes, dulled by the contact time."""
    return push(ring(GROUND_MODES, 0.94), contact_s)


def log_contacts(knock_t60_s=.028, first_contact_s=0.00035, second_contact_s=.0004):
    """First contact thumps and knocks the log; a moment later the log loads block and earth."""
    out = np.zeros((2, N))
    ground = earth(contact_s=.004)
    for s, thump_db, pitch, knock_hz, knock_db, crunch_db, brightness in FIRST_CONTACTS:
        knock = ring([(knock_hz, knock_db, knock_t60_s)], 0.99)
        add(out, s, push(amp(thump_db) * thump(pitch) + knock, first_contact_s))
        add(out, s, amp(thump_db + FIRST_GROUND_DB) * ground)
        add(out, s, contact_crunch(thump_db, crunch_db, brightness, FIRST_T60_S))
    for s, thump_db, pitch, ground_db, crunch_db, brightness in SECOND_CONTACTS:
        add(out, s, amp(thump_db) * push(thump(pitch), second_contact_s))
        add(out, s, amp(ground_db) * ground)
        add(out, s, contact_crunch(thump_db, crunch_db, brightness, SECOND_T60_S))
    for s, db in EARTH_THUDS:
        add(out, s, amp(db) * earth(contact_s=0.0078))
    return out


def scene():
    """Woodwork close by, its treble leaning left; most bird voices further off."""
    work = log_contacts() + knocks() + skids() + rubs() + swishes()
    work = yard(work, near_db=-12.5, near_t60_s=0.17, tail_db=-23.5, low_t60_s=.45, high_t60_s=0.97,
                echo_db=-38.0, echo_s=0.05)
    treble = band(work, 2000, 13000, order=1)
    work = work + treble * np.array([[.2], [-.2]])
    bird_pan_db = np.array([[.7], [-.7]])
    return work + birds() * amp(bird_pan_db) + outdoors()


def record(dry):
    """Right channel one sample late; deep bass cut, peaks rounded, top cut."""
    ports = np.array([dry[0], np.roll(dry[1], 1)])
    ports = signal.sosfilt(signal.butter(4, 50, "high", fs=SR, output="sos"), ports)
    rounded = np.tanh(0.78 * ports) / 0.84
    return signal.sosfilt(signal.ellip(8, .2, 70, TOP_HZ, fs=SR, output="sos"), rounded)


dry = scene()
out = record(dry)
to_wav(out)
```